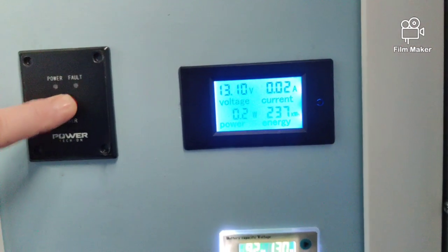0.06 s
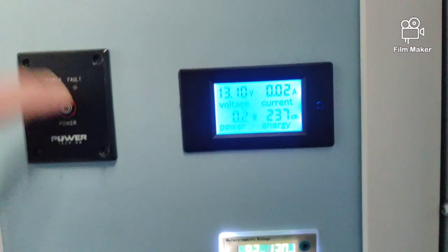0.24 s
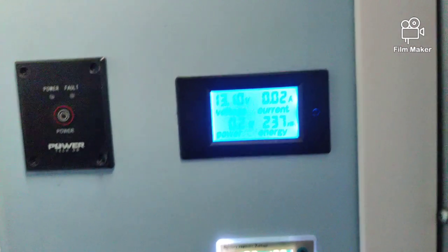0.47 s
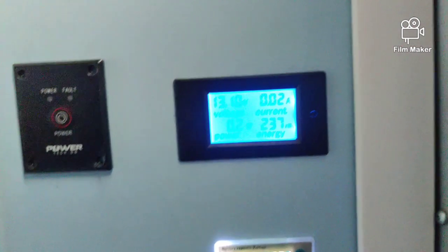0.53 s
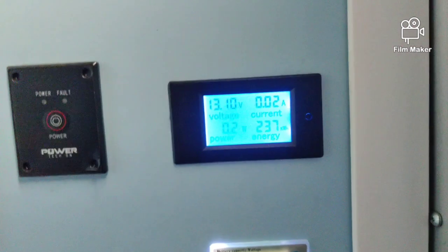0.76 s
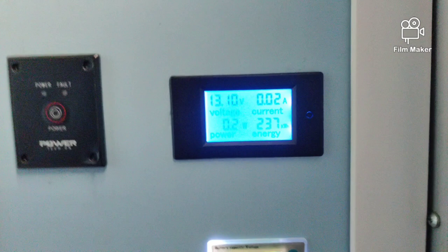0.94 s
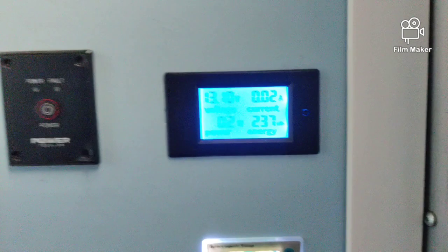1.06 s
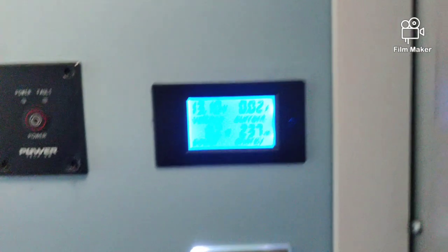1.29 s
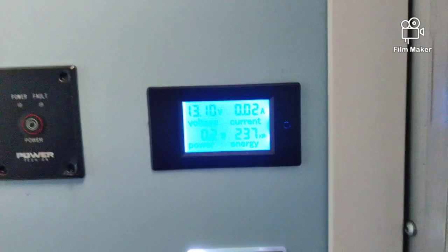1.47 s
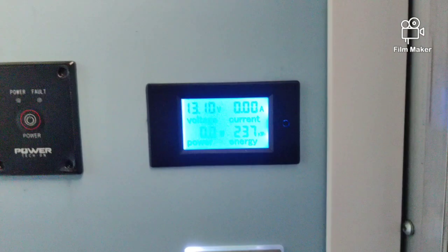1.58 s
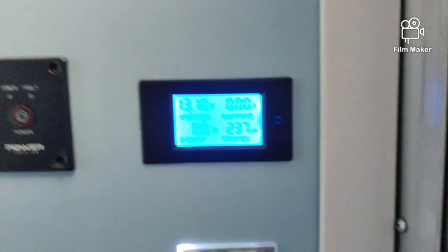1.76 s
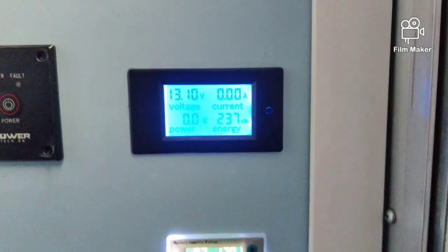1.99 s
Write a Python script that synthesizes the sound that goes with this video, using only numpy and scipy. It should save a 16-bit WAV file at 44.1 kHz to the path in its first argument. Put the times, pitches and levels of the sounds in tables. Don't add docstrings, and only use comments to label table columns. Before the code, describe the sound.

Sharp plastic switch click, close up in a small, dry trailer interior, with quiet low hum and slight hiss beneath; after a calm stretch, a burst of grip noise rattles the phone microphone, mostly on the left.

```python
import sys
import numpy as np
from scipy import signal
from scipy.fft import rfft, irfft
from scipy.io import wavfile
from scipy.ndimage import uniform_filter1d

SR = 44100
rng = np.random.default_rng(int(sys.argv[2]) if len(sys.argv) > 2 else 0)


def master_out(mix):
    frames = np.transpose(np.atleast_2d(mix))
    ceiling = np.clip(frames, -1, 1)
    pcm = np.round(ceiling * 32767).astype(np.int16)
    wavfile.write(sys.argv[1], SR, pcm)


def to_linear_factor(level_db):
    exponent = np.asarray(level_db, float) / 20
    return 10 ** exponent


N = 89611
T = np.arange(N) / SR

# (time [s], peak level [dB])
SWITCH_HITS = [
    (0.1013, -53),
    (.1243, -27),
]
# (frequency [Hz], level [dB], t60 [s])
PANEL_MODES = [(100, -16, 0.43), (282, -10.5, 0.03), (416, -11, 0.062), (609, -13.5, 0.077),
               (870, -16, 0.013), (1065, -2, 0.023)]
# (frequency [Hz], level [dB])
CAP_MODES = [(1760, -12), (2550, 0), (3100, -12), (3650, -1.5), (4500, -2.5), (5400, -13.5), (6700, -8.5),
             (7800, -18)]
# (time [s], left peak [dB], right peak [dB])
CASE_TICKS = [(0.3874, -55, -69), (0.8346, -55.5, -62), (1.5545, -66, -68), (1.682, -60, -58),
              (1.7861, -36.5, -29), (1.789, -40, -31.5), (1.7921, -37, -43), (1.8019, -35.5, -30),
              (1.8059, -39, -47), (1.8085, -38, -44), (1.811, -34, -41), (1.8154, -37, -36),
              (1.8252, -45, -48), (1.828, -22, -35.5), (1.829, -28, -26.5), (1.8302, -37, -46),
              (1.8307, -34, -29), (1.8326, -41, -34.5), (1.8335, -47, -42), (1.8372, -47, -48),
              (1.843, -41, -43), (1.8488, -43, -42), (1.8537, -41, -48), (1.8555, -37, -45),
              (1.861, -54, -45), (1.9364, -63, -40.5), (1.942, -52, -42.5), (1.9453, -40, -58),
              (1.952, -47, -64), (1.957, -47, -61), (1.9722, -34.5, -38), (1.981, -47, -41),
              (1.9734, -37, -36), (1.9881, -40, -47), (1.991, -47, -47), (1.9939, -40, -52),
              (1.997, -48, -44), (2.001, -49, -45)]
# (time [s], frequency [Hz], left level [dB], right level
# [dB])
CASE_KNOCKS = [(1.781, 870, -56, -59), (1.789, 930, -48.5, -77), (1.800, 516, -46, -63),
               (1.8095, 750, -51.5, -60), (1.828, 480, -61, -45), (1.83, 1100, -61, -67),
               (1.941, 393, -60, -68), (1.972, 480, -60, -56), (1.986, 390, -65, -67),
               (1.8115, 900, -60, -50), (1.786, 2900, -50, -61), (1.7895, 2920, -52, -66),
               (1.9715, 2110, -57, -56), (1.942, 2680, -50, -62), (1.7955, 394, -39, -53),
               (1.8008, 6900, -42, -56), (1.8172, 6500, -50, -60), (1.8178, 4200, -52, -52),
               (1.9453, 7000, -44, -70), (1.942, 5800, -49, -66), (1.9375, 2700, -56, -68),
               (1.7862, 3700, -50, -50), (1.8008, 3900, -52, -50), (1.7865, 5800, -52, -48),
               (1.9715, 6600, -44, -52)]
# (time [s], frequency [Hz], left level [dB], right level [dB])
PORT_PINGS = [(1.9716, 4800, -46, -33), (1.976, 4750, -56, -44), (1.979, 8000, -46, -70),
              (1.9875, 8000, -42, -70), (1.9908, 8150, -39, -58), (1.8535, 7900, -44, -70),
              (1.8475, 7700, -50, -70)]
# (start [s], length [s], left level [dB],
# right level [dB])
SKIN_RUBS = [(0, 0.026, -53.5, -45), (0.048, 0.28, -76, -89), (0.302, 0.24, -71, -94),
             (.52, .25, -74.5, -81), (1.433, .11, -73.5, -85), (1.601, .07, -73.5, -94),
             (1.69, 0.074, -71, -93), (1.776, 0.017, -59, -57.5), (1.797, 0.02, -53, -64),
             (1.829, 0.028, -61, -62), (1.872, 0.087, -70, -68), (1.933, .015, -57, -81),
             (1.947, 0.038, -59, -74), (1.972, 0.036, -53, -53), (1.849, 0.0073, -54.5, -67),
             (0.383, 0.055, -77, -88)]
# (time [s], width [s], left size [amplitude], right size [amplitude])
PALM_THUMPS = [(.02, .006, -.003, -.003), (1.7957, .0008, .072, .008), (1.7977, .0009, -.022, -.003),
               (1.7998, .0008, .014, 0), (1.8065, .002, -.006, 0), (1.802, .0018, -.032, -.002),
               (1.8098, .001, -.022, 0), (1.812, .0018, .018, .004), (1.817, .0015, -.03, -.008),
               (1.8225, .0025, .022, 0), (1.828, .003, .022, 0), (1.843, .002, -.007, 0),
               (1.938, .002, -.008, 0), (1.943, .002, .011, 0), (1.974, .001, .011, .002),
               (1.95, .005, -.004, -.003)]
# (time [s], pitch [Hz], level [dB])
MOTOR_CURVE = [
    (0.0, 147, -55),
    (0.05, 148, -66),
    (0.12, 141.7, -54.5),
    (0.3, 110.7, -57),
    (0.41, 108.8, -52.5),
    (0.96, 107.4, -55.5),
    (2.03, 111.4, -49),
]
# (time [s], pitch [Hz], level [dB])
FAN_CURVE = [
    (0, 180.5, -72),
    (.25, 180.4, -63.5),
    (.5, 186.5, -65.5),
    (.8, 194, -68.5),
    (1.15, 186.7, -70),
    (1.7, 192.6, -73.5),
    (2.03, 198.5, -72),
]
# (frequency [Hz], level [dB])
RUMBLE_COLOUR = [(20, 4), (45, -3.5), (90, 3.5), (140, -7.5), (220, -10), (300, -18.5), (450, -29.5),
                 (800, -51.5)]
# (frequency [Hz], level [dB])
HISS_COLOUR = [(150, -4), (500, 0.5), (1000, -2.5), (2000, -5.5), (4000, -8.5), (8000, -13), (12000, -9.5),
               (16000, -11.5)]
# (frequency [Hz], t60 [s])
ROOM_DECAY = [(100, 0.17), (500, 0.12), (2000, 0.043), (5000, 0.15), (10000, 0.094)]
# (frequency [Hz], width [Hz], level [dB])
LEFT_RINGS = [(2810, 540, -21.5), (4100, 480, -18), (4630, 550, -16), (6790, 840, -10), (7725, 1150, 0),
              (8800, 2300, -20.5)]
RIGHT_RINGS = [(2100, 1300, -23.5), (4330, 750, -11.5), (4700, 947, -0.5), (6500, 760, -18.5),
               (10500, 1200, -42)]


def evened(x):
    return x / np.sqrt(np.mean(x ** 2, -1, keepdims=True) + 1e-20)


def filtered(x, order, hz, kind="low"):
    return signal.lfilter(*signal.butter(order, hz, kind, fs=SR), x)


def read(points, hz):
    f, value = np.transpose(points)
    return np.interp(np.log(hz + 1), np.log(f + 1), value)


def noise(points):
    colour = to_linear_factor(read(points, np.fft.rfftfreq(N, 1 / SR)))
    return evened(irfft(rfft(rng.standard_normal((2, N))) * colour, N))


def slow(rate_hz):
    rates = np.geomspace(.5, rate_hz, num=12)
    return evened(sum(np.sin(2 * np.pi * (f * T + rng.random())) for f in rates))


def ring(x, hz, width):
    r = np.exp(-np.pi * width / SR)
    return 2 * signal.lfilter([1 - r], [1, -r * np.exp(2j * np.pi * hz / SR)], x).real


def ports(x):
    out = []
    for v, rings, flat_db in zip(filtered(x, 2, 1800, "high"), (LEFT_RINGS, RIGHT_RINGS), (-26.5, -42)):
        rung = sum(to_linear_factor(db) * ring(ring(v, hz, width), hz, width) for hz, width, db in rings)
        out.append(to_linear_factor(flat_db) * v + rung)
    return np.array(out) * to_linear_factor([[10], [12]])


def room(x):
    first, length = 90, 12000
    chosen = (rng.random((2, length)) < .1) * (np.arange(length) > first)
    taps = rng.choice([-1., 1.], (2, length)) * chosen
    hz, t, z = signal.stft(taps, SR, nperseg=128)
    decay = to_linear_factor(-60 * t / read(ROOM_DECAY, hz)[:, None])
    tail = signal.istft(z * decay, SR, nperseg=128)[1]
    tail = tail * (np.arange(z.shape[2] * 64 - 64) > first)
    tail = tail / np.linalg.norm(tail, axis=1, keepdims=True)
    return signal.fftconvolve(x, tail, axes=1)[:, :N]


def switch():
    snap_s, cap_t60_s, rattle_s = .0001, 0.0066, 0.0039
    lag_s, echo_s = 0.00011, .0004
    t = np.arange(9000) / SR
    snap = -np.exp(-abs(t / snap_s - 5) * np.where(t < 5 * snap_s, .8, 1.4))
    late = np.maximum(t - 4 * snap_s, 0)
    panel = sum(-to_linear_factor(db - 60 * t / t60) * np.sin(2 * np.pi * hz * late) for hz, db, t60 in PANEL_MODES)
    cap = sum(-to_linear_factor(db - 60 * late / cap_t60_s) * np.sin(2 * np.pi * hz * late) for hz, db in CAP_MODES)
    chatter = filtered(rng.standard_normal(len(t)), 1, [1500, 6000], "band")
    rattle = (t > 8 * snap_s) * np.exp(-t / rattle_s) * chatter

    hits = np.zeros((2, N))
    for s, db in SWITCH_HITS:
        hits[0, round(s * SR)] += to_linear_factor(db)
        hits[1, round((s + lag_s) * SR)] += 0.99 * to_linear_factor(db)
        hits[1, round((s + lag_s + echo_s) * SR)] += 0.76 * to_linear_factor(db)
    strike = to_linear_factor(-3.5) * snap + .5 * panel + to_linear_factor(-4) * cap
    dry = signal.fftconvolve(hits, strike[None], axes=1)[:, :N]
    dry = dry + to_linear_factor([[-6], [-1]]) * signal.fftconvolve(hits[0], rattle)[:N]
    dry = dry + to_linear_factor(-16) * ports(dry)
    wet = dry + to_linear_factor(-10.5) * room(dry)
    return np.array([filtered(v, 4, top_hz) for v, top_hz in zip(wet, (8800, 5600))])


def ticks():
    fizz_s = 0.00026
    level, crack = np.zeros((2, N)), np.zeros((2, N))
    for s, left_db, right_db in CASE_TICKS:
        u = np.maximum(T - s, 0) / fizz_s
        level += u * np.exp(1 - u) * to_linear_factor([[left_db], [right_db]])
        crack[:, round(s * SR)] = to_linear_factor([left_db, right_db])
    fizz = level * rng.choice([-1., 1.], N)
    dry = to_linear_factor([[13.5], [9]]) * crack + to_linear_factor(-7.5) * fizz
    return dry + to_linear_factor(-11.5) * room(dry)


def knocks(table, turns):
    longest_rise_s = 0.0012
    out = np.zeros((2, N))
    for s, hz, left_db, right_db in table:
        u = np.maximum(T - s, 0) / min(longest_rise_s, turns / hz)
        out += u * np.exp(1 - u) * np.sin(2 * np.pi * hz * (T - s)) * to_linear_factor([[left_db], [right_db]])
    return out


def thumps():
    out = np.zeros((2, N))
    for s, width, left, right in PALM_THUMPS:
        out += np.exp(-.5 * ((T - s) / width) ** 2) * np.array([[left], [right]])
    return out


def rubs():
    rise, fall_s = 0.29, 0.0094
    level = np.zeros((2, N))
    for s, length, left_db, right_db in SKIN_RUBS:
        u = np.clip((T - s) / length, 0, 1)
        swell = np.sin(np.pi / 2 * np.minimum(u / rise, 1)) ** 2
        sag = 1 - 0.66 * u ** 2
        release = np.exp(-np.maximum(T - s - length, 0) / min(fall_s, length))
        level += swell * sag * release * to_linear_factor([[left_db], [right_db]])
    grain = to_linear_factor(3.5 * evened(uniform_filter1d(rng.standard_normal(N), size=70)))
    return level * evened(grain * rng.standard_normal((2, N)))


def handling():
    air = to_linear_factor([[-80], [-75]]) * rng.standard_normal((2, N))
    skin, cracks = rubs(), ticks()
    wide = to_linear_factor([[-3], [-10]]) * filtered(skin, 2, 5500, "high")
    broad = to_linear_factor([[7], [-30]]) * filtered(skin, 2, [6200, 9200], "band")
    dull = to_linear_factor(-5) * filtered(skin, 1, [200, 1200], "band")
    body = to_linear_factor([[-11.5], [-7]]) * filtered(cracks, 2, [350, 3200], "band")
    return ports(cracks + skin + air) + wide + broad + dull + body


def press_tail():
    tail = filtered(rng.standard_normal((2, N)), 2, [3830, 11500], "band")
    return to_linear_factor([[-39], [-50]]) * np.exp(-T / 0.015) * tail


def end_scrape():
    scrape = evened(filtered(rng.standard_normal(N), 1, 500))
    return to_linear_factor(-58) * np.clip((T - 2.027) / 0.0026, 0, 1) * scrape


def tone(table, ratio=1):
    s, hz, db = np.transpose(table)
    pitch = ratio * np.interp(T, s, hz) * (1 + 0.014 * slow(17))
    turns = np.cumsum(pitch) / SR + rng.random()
    level_db = np.interp(T, s, db) + 1.5 * slow(12)
    return np.sqrt(2) * to_linear_factor(level_db) * np.sin(2 * np.pi * turns)


def hum():
    lines = tone(MOTOR_CURVE) + to_linear_factor(-6.5) * tone(MOTOR_CURVE, .632) + tone(FAN_CURVE)
    a, b = noise(RUMBLE_COLOUR)
    same = 0.96
    rumble = to_linear_factor(-59.5) * np.array([a, same * a + np.sqrt(1 - same ** 2) * b])
    return (lines + rumble) * to_linear_factor([[-1], [1]])


def scene():
    struck = knocks(CASE_KNOCKS, 1.64) + knocks(PORT_PINGS, 6)
    return switch() + handling() + struck + thumps() + press_tail() + end_scrape() + hum()


def low_pass(x):
    return signal.sosfilt(signal.butter(12, 16450, fs=SR, output="sos"), x)


def record(dry):
    top_edge = signal.ellip(8, .5, 22, 15900, fs=SR, output="sos")
    x = signal.sosfilt(top_edge, dry + to_linear_factor(-74.5) * noise(HISS_COLOUR))
    x = filtered(x, 1, 18, "high")
    return low_pass(x)


dry = scene()
out = record(dry)
master_out(out)
```